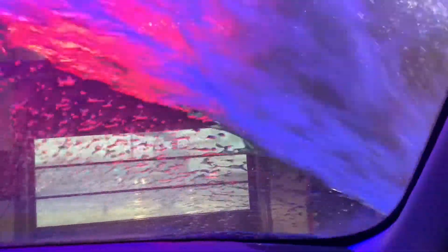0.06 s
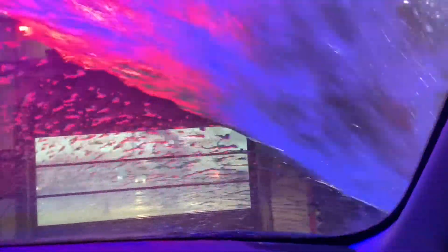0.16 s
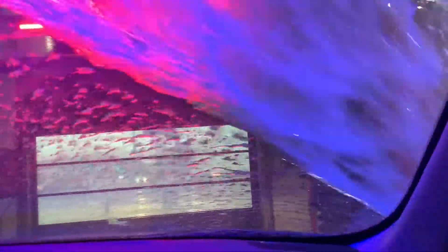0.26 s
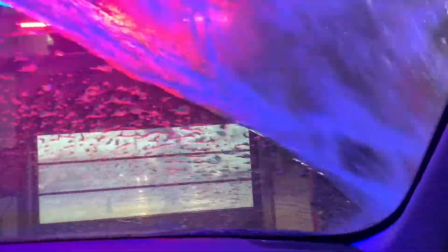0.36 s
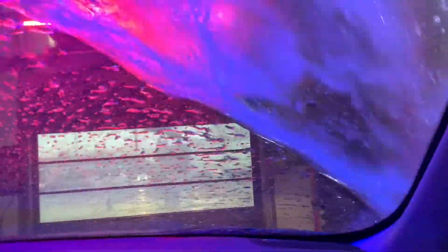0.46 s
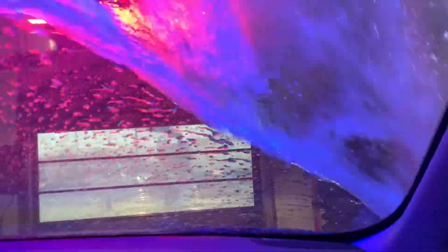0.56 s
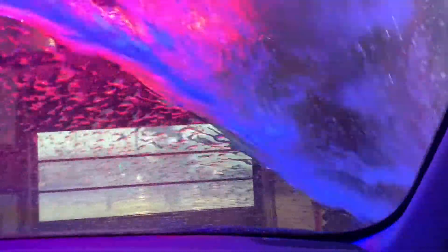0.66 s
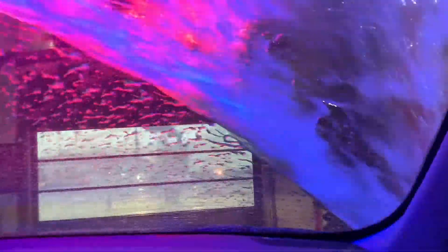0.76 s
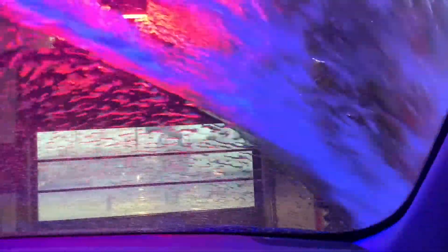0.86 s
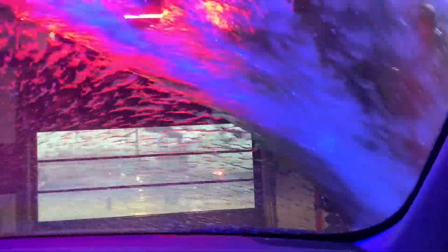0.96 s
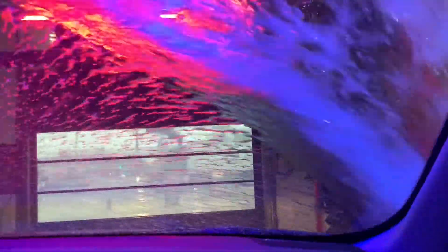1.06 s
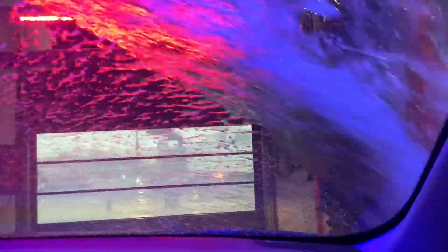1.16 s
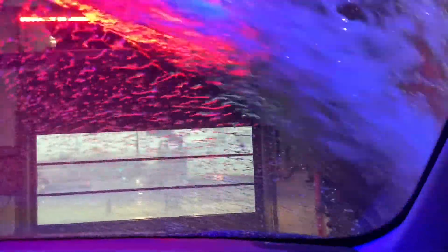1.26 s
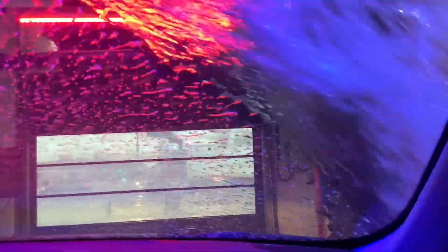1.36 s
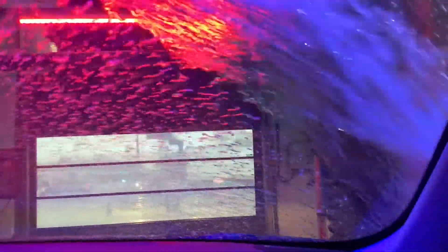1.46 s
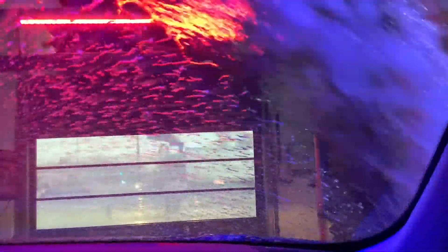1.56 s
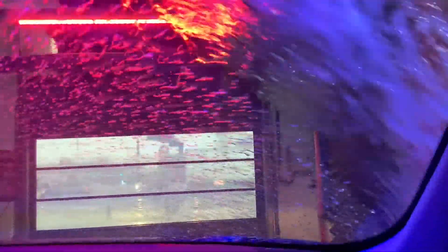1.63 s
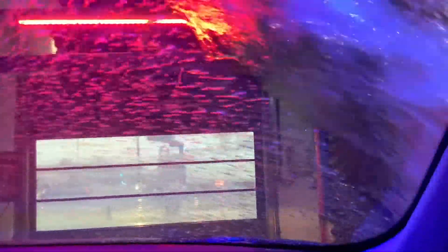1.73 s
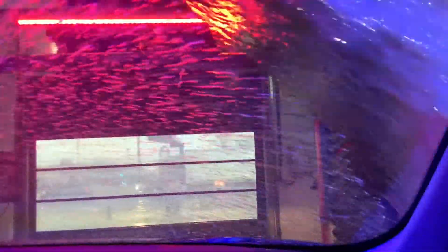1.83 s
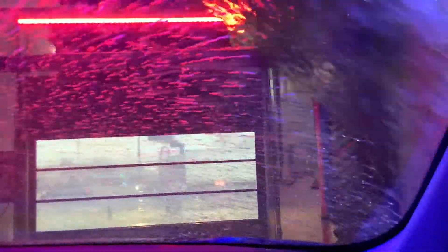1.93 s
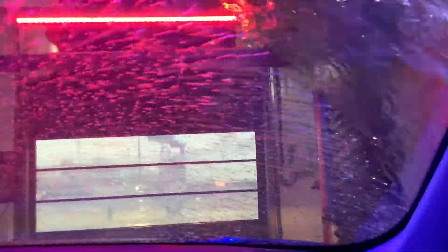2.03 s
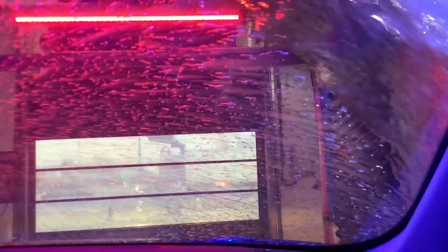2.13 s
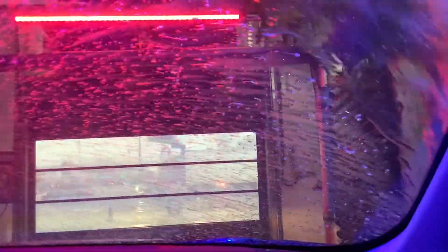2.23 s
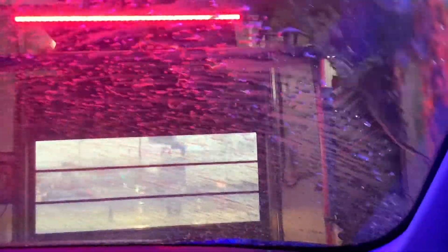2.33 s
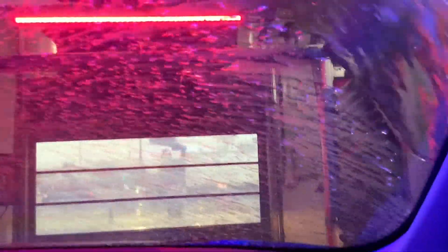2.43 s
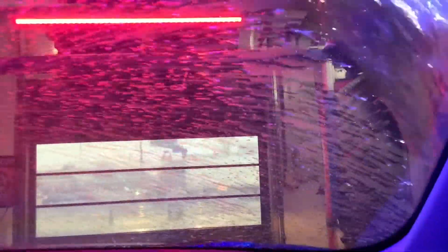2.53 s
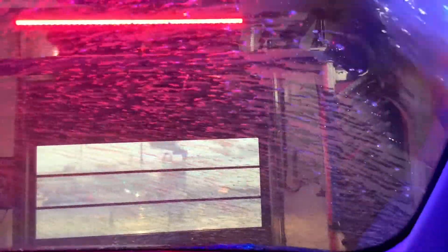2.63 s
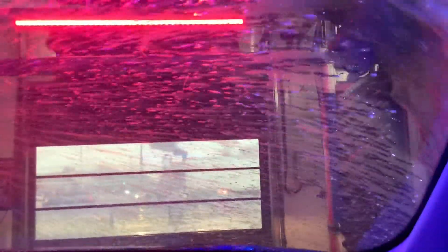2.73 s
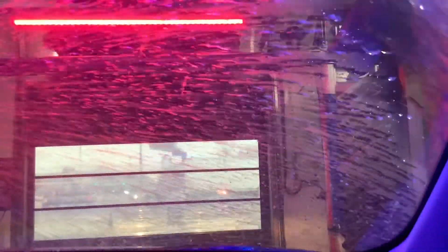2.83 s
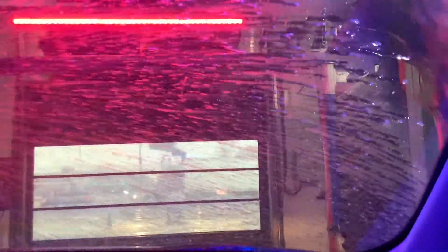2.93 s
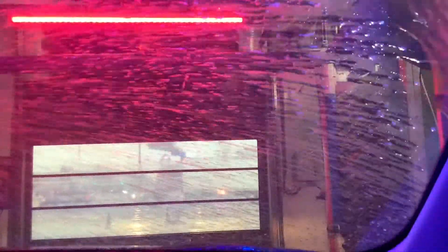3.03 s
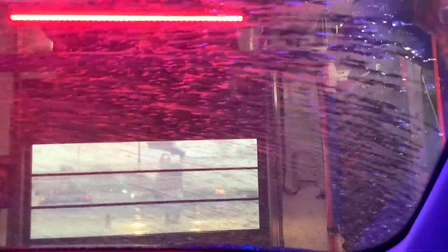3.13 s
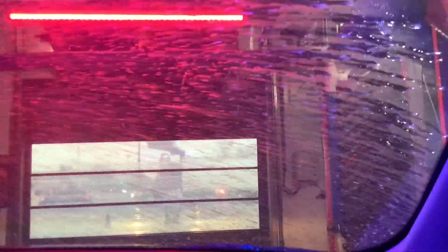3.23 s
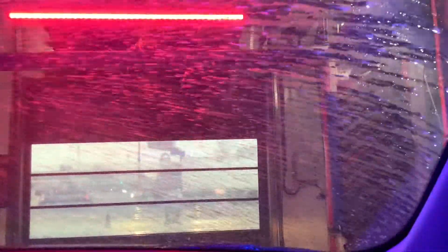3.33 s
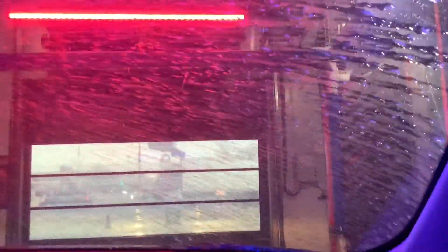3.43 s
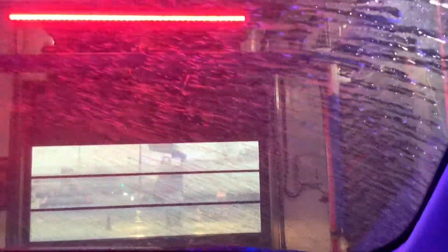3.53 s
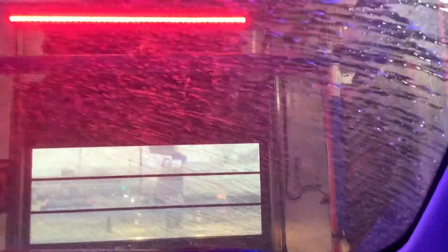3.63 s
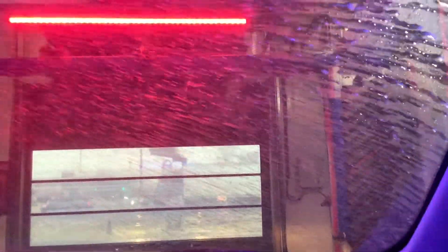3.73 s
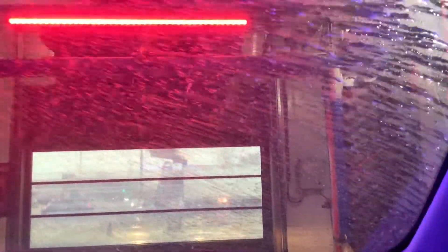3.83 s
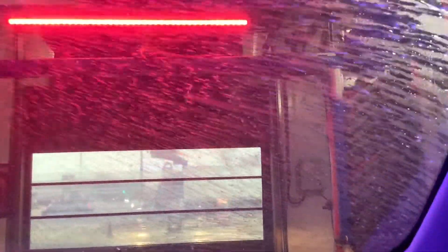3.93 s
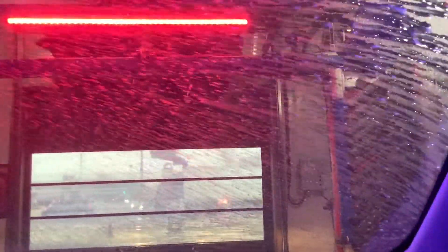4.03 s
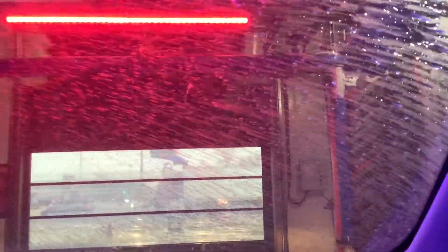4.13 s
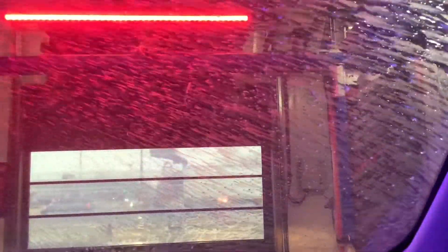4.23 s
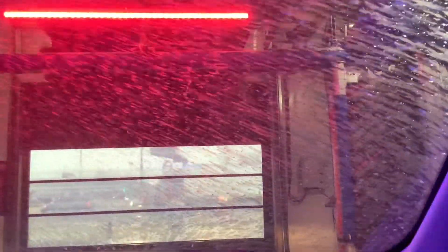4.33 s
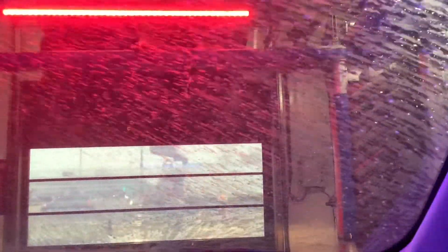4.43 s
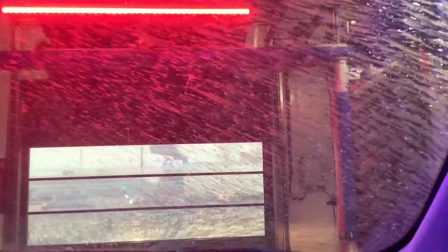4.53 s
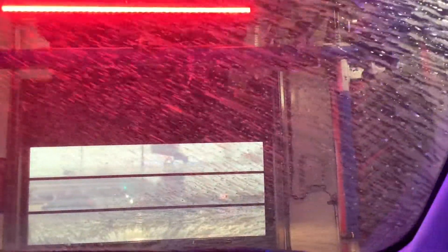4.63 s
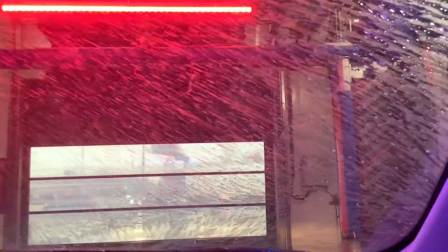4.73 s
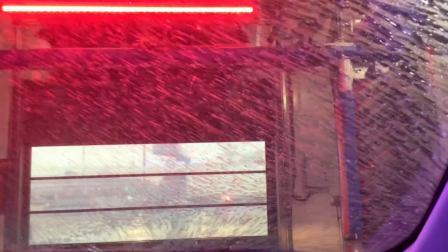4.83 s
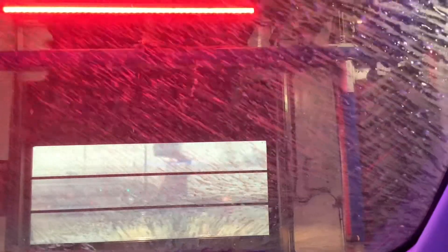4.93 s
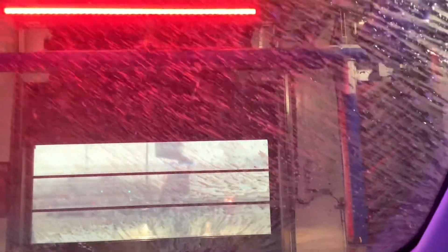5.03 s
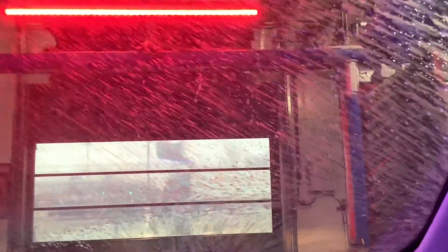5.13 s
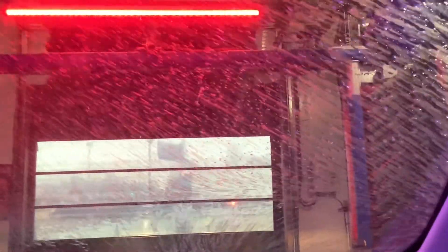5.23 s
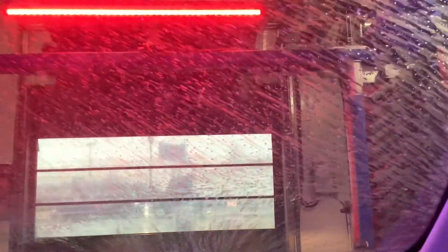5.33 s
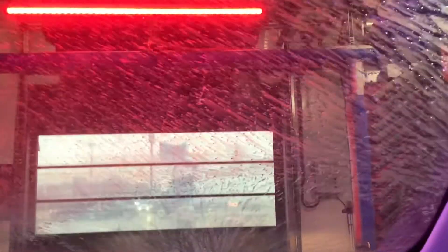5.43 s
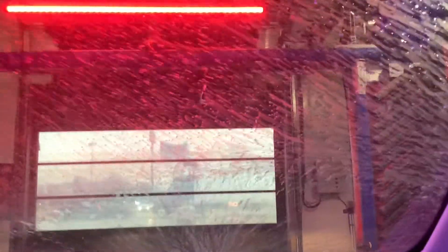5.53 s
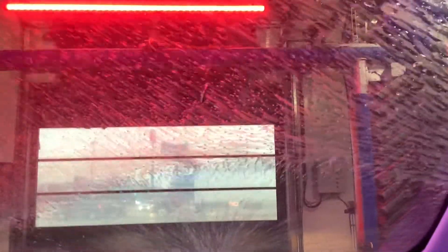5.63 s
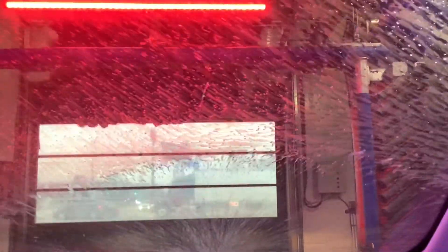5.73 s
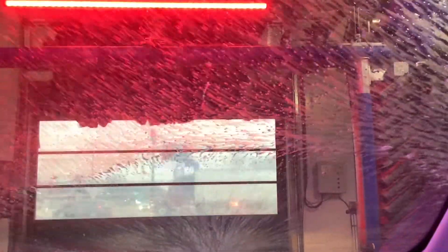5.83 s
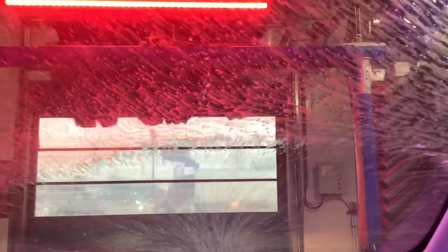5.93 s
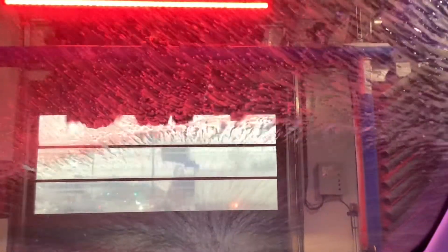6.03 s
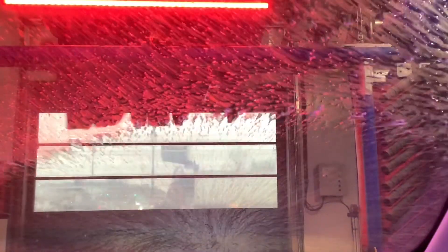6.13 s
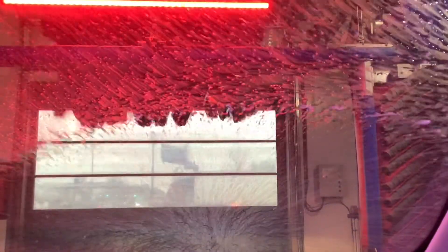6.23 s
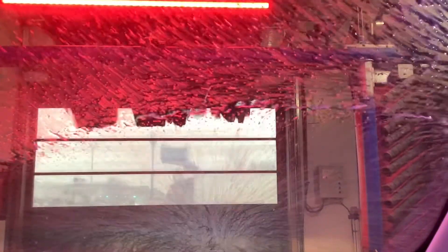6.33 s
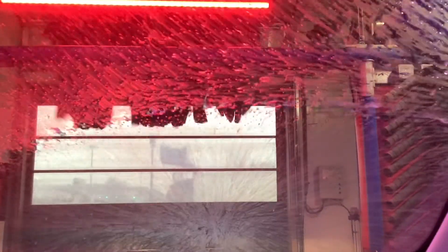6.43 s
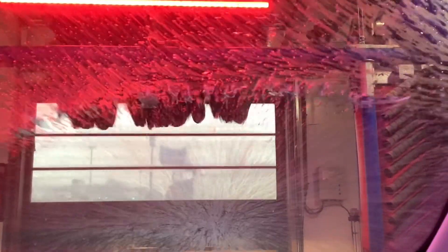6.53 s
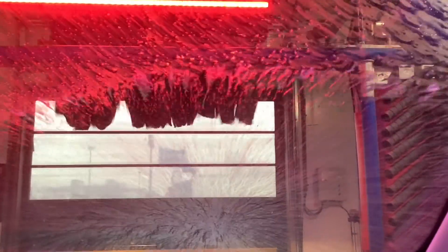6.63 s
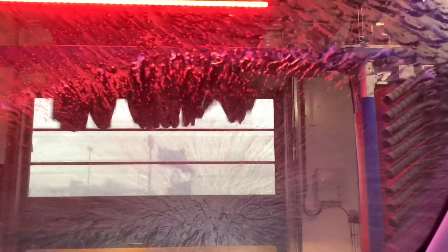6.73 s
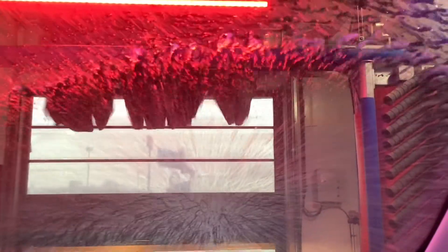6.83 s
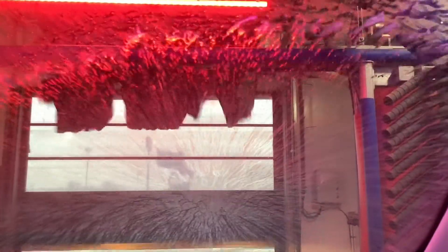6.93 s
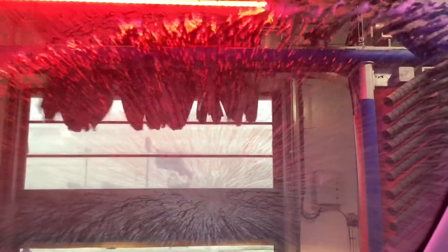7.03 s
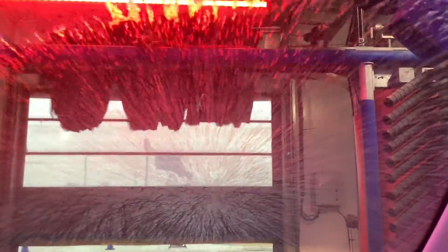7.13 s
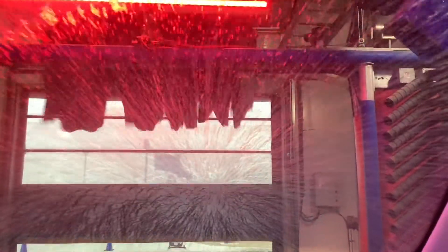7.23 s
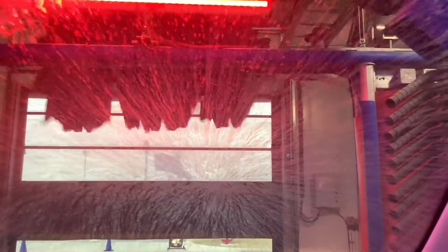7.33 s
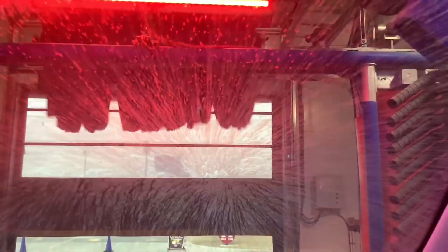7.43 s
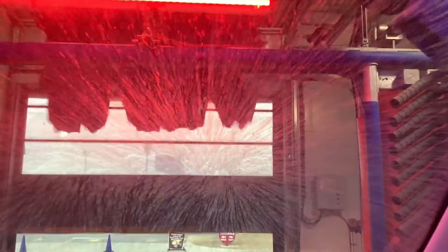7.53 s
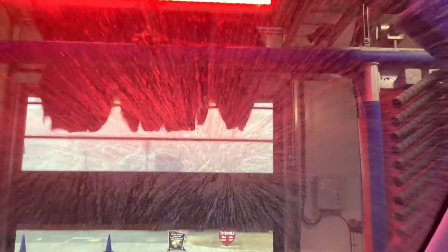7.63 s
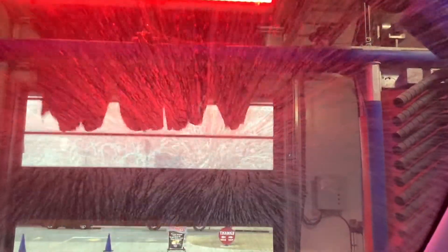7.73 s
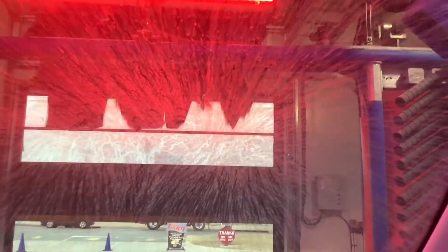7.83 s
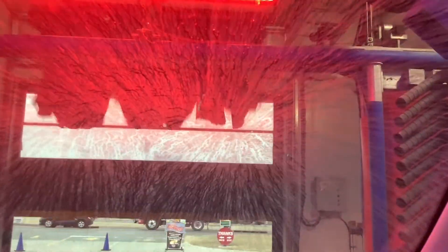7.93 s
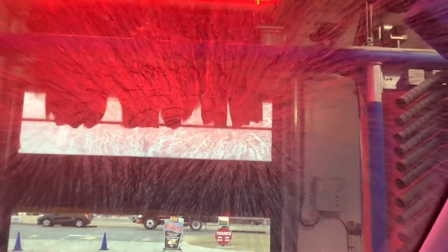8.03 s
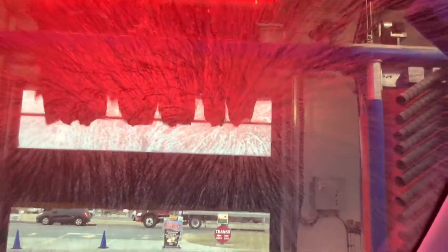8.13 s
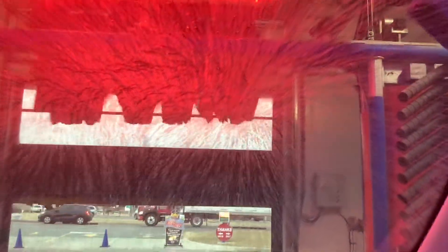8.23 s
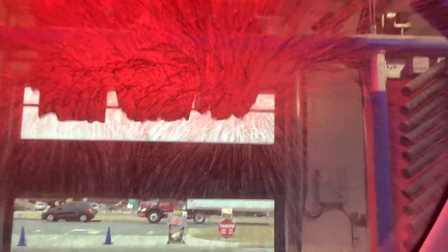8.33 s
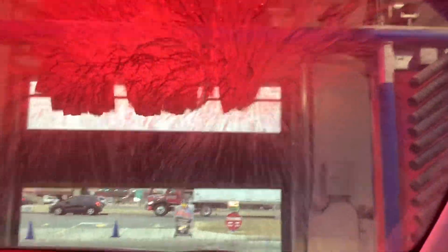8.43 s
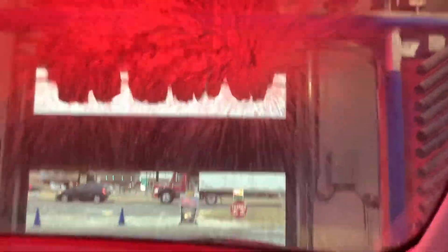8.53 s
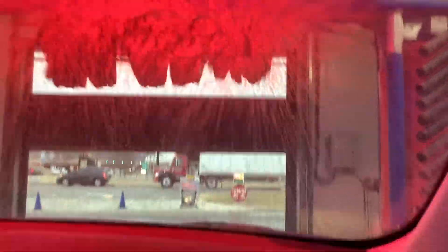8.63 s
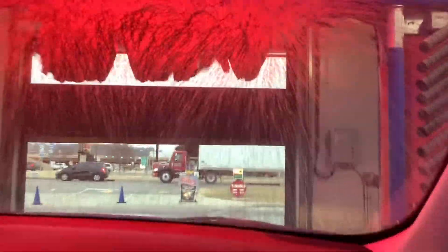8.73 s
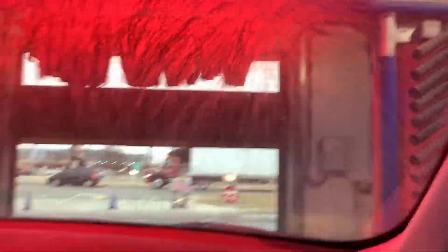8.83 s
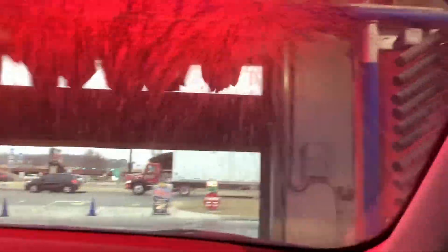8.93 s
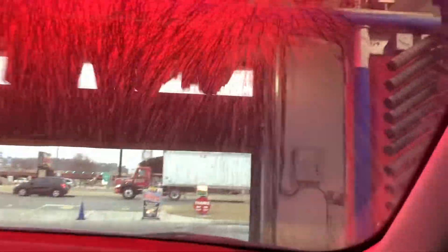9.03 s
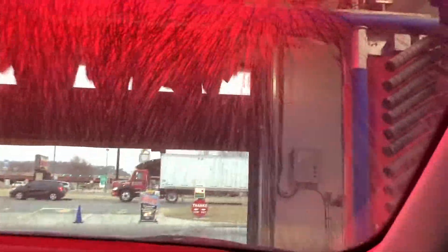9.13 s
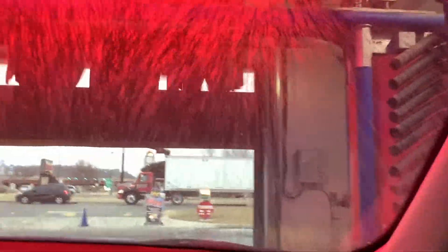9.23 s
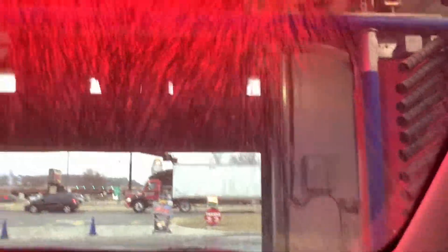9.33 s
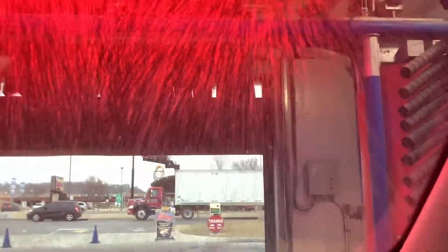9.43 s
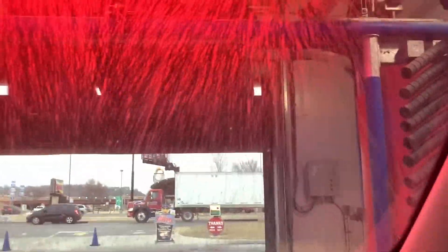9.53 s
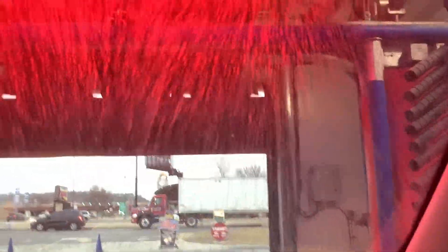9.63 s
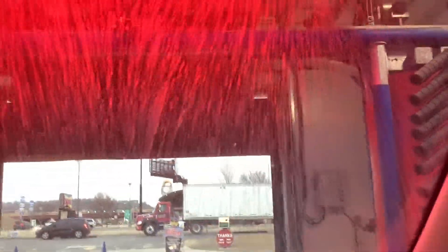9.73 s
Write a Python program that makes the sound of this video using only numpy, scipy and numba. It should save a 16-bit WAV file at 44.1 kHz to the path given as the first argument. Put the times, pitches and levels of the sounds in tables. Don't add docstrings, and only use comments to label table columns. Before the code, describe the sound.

From the front seat of a closed car in a wash tunnel, rinse water hisses and slops across the windscreen with dull, ringing knocks for three seconds. Low rumble underlies it. Dryer air then grows into a heavy, fluttering cabin boom with roof drumming and wandering hum, while the water hiss thins. Small plastic ticks and faint cloth rustle sound close to the phone near the end.

```python
import sys
import numpy as np
from scipy import signal
from scipy.fft import rfft, irfft
from scipy.io import wavfile
from scipy.ndimage import uniform_filter1d, map_coordinates
from numba import njit

SR = 44100
rng = np.random.default_rng(int(sys.argv[2]) if len(sys.argv) > 2 else 0)


def gain_from_db(level_db):
    decades = np.asarray(level_db, float) / 20
    return 10 ** decades


def store_wav(level_fs):
    pcm = np.round(np.clip(np.atleast_2d(level_fs), -1, 1) * 32767)
    wavfile.write(sys.argv[1], SR, pcm.T.astype(np.int16))


N = 430416
FREQ = np.arange(N // 2 + 1) * SR / N
TIME = np.arange(N) / SR

# (time [s], force [dB], share on the roof panels [0-1])
BLOWER = [(0, -25, 0.47), (1, -25.5, 0.19), (1.6, -29, 0.4), (2.2, -24.5, 0.26), (3.3, -26.5, 0.3),
          (4, -24.5, 0.26), (4.6, -20.5, 0.13), (5.3, -15, 0.28), (5.8, -17, 0.62), (6.6, -14.5, 0.63),
          (7.2, -15.5, 0.27), (8.2, -15, 0.44), (9.1, -17, 0.29), (9.76, -17.5, 0)]
FAR_FORCE_DB = -25
# (frequency [Hz], width [Hz], level [dB])
MOTOR_MODES = [(707, 8.4, -46), (974.6, 27, -53.5), (1415, 39, -57), (1632, 130, -59)]

# (frequency [Hz], width [Hz], level [dB])
CABIN_MODES = [(78.2, 5.2, -1.5), (87.7, 9.7, 0), (100.6, 10, -1.5), (117.8, 14.4, 1)]
# (frequency [Hz], width [Hz], level [dB])
UPPER_CABIN_MODES = [(141, 30, -2.5), (164.5, 18, -7), (182.4, 26, -6.5), (211, 6.8, -7.5)]
# (frequency [Hz], level [dB])
PANEL_SPECTRUM = [(120, -24), (200, -7.5), (253, -8.5), (385, -11.5), (491, -12), (712, -23), (781, -22.5),
                  (1100, -33.5), (1430, -37), (2420, -120)]
# (time [s], lift [dB], length [s])
BOOM_BUFFETS = [(.04, -1, 0.063), (1.0, 3.5, 0.045), (2.15, 5, 0.061), (2.66, -15, 0.058),
                (3.59, -1.5, 0.04), (4.29, 6.5, 0.064), (5.16, -29, 0.016), (6.11, 1.5, 0.057),
                (6.22, 2, 0.062), (6.41, -3, 0.041), (6.67, 0.5, 0.066), (6.79, -8, 0.064),
                (6.87, 7.5, 0.023), (6.98, -4.5, 0.053), (7.18, 2, 0.073), (7.34, -6, 0.19),
                (7.8, 5.5, 0.03), (7.91, -7, 0.041), (8.26, 4, 0.046), (8.62, 0.5, 0.038),
                (8.89, -5, 0.039), (9.1, 10.5, 0.05), (9.2, -3, .06), (9.68, 7, 0.041)]
# (time [s], lift [dB], length [s])
UPPER_BUFFETS = [(.75, 2.5, .06), (5.4, -2.5, .1), (7.3, 1, .08), (8.3, 1, 0.097), (8.55, 0.5, .08),
                 (9.0, 2.5, 0.052), (9.45, 0.5, .06), (1.4, 4.5, 0.43), (2.17, 4, 0.11), (3.45, -1, 0.18),
                 (3.7, 3.5, 0.046), (4.1, 1.5, 0.097), (4.61, -8, 0.075), (5.03, -5, 0.03),
                 (5.2, -3.5, 0.046), (5.63, 9, 0.019), (6.08, 3.5, 0.071), (6.22, 3, 0.065),
                 (6.52, 1.5, 0.053), (6.69, 4, 0.064), (7.04, 3.5, 0.041), (7.62, 1, 0.056),
                 (7.91, -5.5, 0.044), (8.07, 2.5, 0.043), (8.74, 3, .03), (8.85, 7.5, 0.021),
                 (9.12, -11, 0.044), (9.62, 0.5, 0.046)]
# (time [s], lift [dB], length [s])
SHAKE_JOLTS = [(.15, -3, .2), (1.2, -1, .12), (1.6, -5, .1), (2.4, 1, .1), (3.4, 6, .12), (3.9, -4, .1),
               (4.35, -4, .1), (5.2, 2, .1), (5.6, 1, .08), (5.95, 6, .08), (6.3, -3, .1), (7.0, 4, .1),
               (7.5, 1, .15), (8.0, 0, .1), (8.6, 2, .15), (9.2, 3, .12)]
# (time [s], lift [dB], length [s])
DRUM_GUSTS = [(3.65, -2, 0.055), (4.4, 0.5, .06), (5.55, 0, 0.11), (6.0, 0, .06), (6.6, 0.5, .08),
              (6.9, 0.5, .08), (8.3, -0.5, .08), (.25, 1, 0.084), (.6, 2.5, 0.074), (.82, 0, 0.11),
              (1.33, -3, 0.064), (1.87, 1, 0.12), (2.4, 1.5, .15), (3.0, 1, 0.065), (3.85, -2, 0.081),
              (4.05, 2, 0.041), (4.65, 1, 0.076), (5.8, -0.5, .15), (6.2, -0.5, 0.16), (7.2, 3, 0.064),
              (7.48, 2.5, 0.13), (7.73, -1, .12), (8.1, -1.5, .08), (8.55, 2, 0.066), (9.15, 0.5, 0.059),
              (9.6, 0.5, .08)]
# (time [s], deep lift [dB], higher lift [dB], length [s])
SWAYS = [(.1, 8, -0.5, 0.2), (.9, -3, -3, 0.071), (1.4, 4.5, -3, 0.14), (2.15, -0.5, -4.5, 0.29),
         (2.65, 10, -1, 0.074), (2.847, 1, -4, .08), (3.213, 7, 3, 0.08), (3.5, 2, -1, 0.13),
         (3.9, 0, 1.5, 0.091), (4.203, 2, -7, 0.068), (4.596, 1, -2, 0.13), (5.1, 1, -4, 0.092),
         (5.736, 8, -11, 0.058), (6.0, 0, 3, 0.15), (6.7, 0, 3.5, 0.21), (7.204, 8.5, -1, 0.16),
         (7.373, 2, -9, .08), (7.8, 2, 2, 0.059), (8.25, 1.5, -1.5, 0.072), (8.5, -1, -5, 0.13),
         (8.844, -2, 2.5, 0.12), (9.053, -13, 0.5, 0.09), (9.3, -0.5, 0.5, 0.13), (9.75, 0, -6, 0.059)]
# (time [s], pitch [Hz])
HUM_PITCH = [(4.5, 112.1), (5.3, 111.9), (5.7, 108.9), (5.9, 117.6), (6.2, 106.3), (6.5, 116.2),
             (6.65, 109.9), (7.0, 114.3), (7.4, 107.9), (7.7, 116.1), (8.1, 111.6), (8.4, 114.4),
             (8.75, 104), (9.15, 115.7), (9.5, 107.7), (9.76, 99.8)]
# (time [s], pitch [Hz], level against the boom [dB])
UPPER_HUM = [(4.6, 158.9, -12), (5.2, 173.1, -10), (5.6, 152, -6), (6.0, 158, -8), (6.3, 166, -5.5),
             (6.75, 155, -10), (7.05, 165, -8), (7.3, 176.3, -11), (7.65, 174.1, -5.5), (8.0, 174.7, -7),
             (8.3, 163, -7), (8.6, 150.3, -10), (8.88, 185.2, -6), (9.2, 152, -16.5), (9.5, 186.7, -4),
             (9.76, 170, -6)]

# (frequency [Hz], width [Hz], level [dB])
GLASS_MODES = [(658, 80, 2), (998, 190, 1), (1470, 163, 0.5), (1685, 55, -0.5), (1957, 170, -2.5),
               (2210, 440, -6.5)]
# (time [s], water left on it [dB], air tearing at it [dB])
SCREEN = [(0, -36, -43.5), (.5, -33, -42), (1.05, -34, -46), (1.4, -34, -47), (1.9, -36.5, -48),
          (2.4, -33.5, -47.5), (2.66, -33, -45.5), (3.05, -32, -46.5), (3.3, -34, -47), (4.85, -36, -47),
          (5.6, -36, -46.5), (6.05, -36, -47), (6.8, -37.5, -49), (7.76, -40.5, -50.5), (8.05, -42, -52.5),
          (9.4, -42.5, -56), (9.76, -41, -55)]
# (time [s], lift [dB])
PATCHES = [(.845, 0), (1.2, 2), (1.37, -2), (1.63, -3), (2.055, -1), (2.143, -2), (2.302, -3), (2.48, -3),
           (2.545, -2), (3.265, -2), (5.88, 2.5), (.14, 1.5), (.25, 1.5), (.43, 1.5), (1.34, -2), (1.66, 0),
           (1.86, 0), (2.03, -1), (2.415, -7), (2.65, 4.5), (3.41, 1), (3.48, -2), (3.69, 4), (3.92, 2),
           (4.12, -1), (4.24, -2), (4.38, 1), (4.46, 1), (4.54, -1), (4.77, 2), (4.89, 0), (4.96, 1),
           (5.08, 0), (5.32, 2), (5.9, 1), (5.95, 2.5), (6.05, 2), (6.2, 0.5), (6.66, 2), (6.88, 2),
           (6.97, -1.5), (7.04, -3), (7.21, 1), (7.26, 1), (7.54, -1), (7.58, -2)]
# (frequency [Hz], level [dB])
STREAM_SPECTRUM = [(290, -24.5), (500, -6), (580, -5.5), (690, -4.5), (788, -7), (976, -10.5), (1100, -8.5),
                   (1400, -9.5), (1830, -11.5), (2000, -13), (3600, -24), (4680, -26.5), (7920, -120)]
# (frequency [Hz], level [dB])
JET_SPECTRUM = [(2400, -0.5), (3600, -1.5), (4400, -2.5), (5050, -3), (5700, -3.5), (6100, -6.5),
                (6800, -6.5)]
# (frequency [Hz], width [Hz], level [dB])
WHISTLE_MODES = [(4400, 150, -6), (5300, 90, 0.5), (5410, 120, -0.5), (7240, 700, -7), (8730, 360, -5)]
# (frequency [Hz], level [dB])
SPRAY_SPECTRUM = [(5600, -7.5), (6400, -15), (7050, -4.5), (8300, -4.5), (8750, -6), (10400, -9),
                  (14600, -16), (16000, -16)]
# (time [s], peak [dB], treble re peak [dB], length [s])
SLOPS = [(0.593, -26, -12, 0.018), (0.905, -24, -16, 0.019), (1.235, -24, -17, .02),
         (1.355, -29, -18, 0.018), (1.412, -22, -14, 0.013), (0.642, -18.5, -19, 0.019),
         (0.863, -21, -13.5, 0.02), (0.991, -16.5, -16, 0.008), (1.07, -21, -11.5, 0.021),
         (1.112, -17, -18, 0.036), (1.269, -17.5, -17, 0.021), (1.444, -21.5, -18, 0.022),
         (1.487, -18.5, -13, 0.021), (1.558, -17, -16.5, 0.05), (1.674, -18.5, -14.5, 0.034),
         (1.748, -16, -21, 0.018), (1.767, -18.5, -13.5, 0.036), (1.803, -19.5, -15, 0.021),
         (1.914, -20, -17, 0.034), (1.972, -22, -11, 0.025), (2.077, -20.5, -13, 0.024),
         (2.152, -17, -16, 0.018), (2.225, -23, -12.5, 0.036), (2.275, -24, -16, 0.082),
         (2.384, -19.5, -20, 0.017), (2.432, -21, -17, 0.012), (2.509, -23, -11, 0.014),
         (2.575, -26.5, -10, 0.013), (2.623, -30, -12, 0.026), (2.688, -19, -20, 0.031),
         (2.81, -33, -15, 0.023), (2.905, -30, -16, 0.019), (3.034, -34, -8, 0.025),
         (3.175, -22, -13, 0.034)]
# (time [s], peak [dB], pitch [Hz])
KNOCKS = [(1.24, -26, 975), (1.362, -22, 976), (1.708, -21, 970), (2.197, -27, 980), (0.4344, -22, 969),
          (0.856, -33, 965), (1.1217, -21, 950), (1.28, -33, 1014), (1.4102, -27, 990), (1.497, -32, 934),
          (1.686, -25, 1000), (1.7559, -27, 934), (1.7736, -20, 963), (1.922, -18, 970), (2.2446, -23, 987),
          (2.5725, -24, 965), (2.7, -16.5, 974), (2.9436, -28, 993), (3.0398, -26, 950)]
# (frequency [Hz], width [Hz], level [dB])
PATTER_MODES = [(700, 60, 0.5), (985, 65, 0), (1430, 90, -4), (1640, 110, -2.5), (2210, 250, -7.5)]

# (time [s], peak [dB], low knock re peak [dB], bright edge re peak [dB], knock pitch [Hz])
TICKS = [(8.0067, -45, -1, -2, 4500), (8.0108, -40, -8, -16, 4600), (8.0714, -52, -5, -12.5, 4400),
         (8.1986, -43, -11, -10.5, 4400), (8.3657, -42, -6, -7, 4798), (8.3727, -45, -8, -10, 5700),
         (8.6275, -53, -0.5, -15.5, 4400), (8.671, -46, 3, -10, 3600), (8.8414, -36, -2.5, -9, 5100),
         (8.9116, -23.5, -9, -7, 4670), (8.9714, -54, -4.5, -15, 5000), (8.996, -40.5, -1, -17, 4700),
         (9.0054, -50, -3, -30, 5500), (9.0356, -43, -5, -21, 4600), (9.117, -53, 0, -30, 7500),
         (9.7325, -56, 8, -32, 7030)]
# (time [s], peak [dB], length [s])
RUBS = [
    (8.615, -58, .001),
    (8.676, -55, .005),
    (8.891, -57, .002),
    (8.228, -58, 0.025),
    (8.288, -51, .025),
    (8.473, -58, 0.023),
    (8.63, -61.5, 0.02),
    (8.692, -60, .016),
    (8.81, -62.5, .03),
]


def unit(x):
    return x / np.sqrt(np.mean(x ** 2))


def columns(table):
    s, *cols = np.transpose(table)
    return [np.interp(TIME, s, c) for c in cols]


def bumps(rows):
    return sum(height * np.exp(-((TIME - s) / length) ** 2) for s, height, length in rows)


def shape(spectrum, skirt_db=-30):
    hz, db = np.transpose(spectrum)
    octave = np.log2(FREQ + 1)
    below = np.maximum(np.log2(hz[0]) - octave, 0)
    above = np.maximum(octave - np.log2(hz[-1]), 0)
    return gain_from_db(np.interp(octave, np.log2(hz), db) + skirt_db * (below + above))


def modes(table):
    total = 0
    for k, (hz, width_hz, db) in enumerate(table):
        damping = 1j * FREQ * width_hz
        total = total + (-1) ** k * gain_from_db(db) * damping / (hz ** 2 - FREQ ** 2 + damping)
    return total


def unrelated_modes(table):
    return np.sqrt(sum(np.abs(modes([mode])) ** 2 for mode in table))


def through(x, gain):
    return irfft(rfft(x) * gain, N)


def drift(noise, rate_hz):
    k = int(SR / rate_hz)
    return unit(uniform_filter1d(uniform_filter1d(noise, k), k))


def walk(rate_hz):
    k = int(SR / rate_hz)
    held = np.repeat(rng.standard_normal(N // k + 1), k)
    return unit(uniform_filter1d(uniform_filter1d(held, k), k)[:N])


def turbulence(gain, shared_db, own_db, rate_hz):
    source = rfft(rng.standard_normal(N)) * gain
    band = np.round(2 * np.log2(FREQ + 1))
    shared = shared_db * walk(rate_hz)
    total = np.zeros(N)
    for b in range(int(2 * np.log2(60)), int(band.max()) + 1):
        total += gain_from_db(shared + own_db * walk(rate_hz)) * irfft(source * (band == b), N)
    return unit(total)


def steady(gain, hold_s, share):
    x = through(rng.standard_normal(N), gain)
    k = int(hold_s * SR)
    power = uniform_filter1d(uniform_filter1d(x ** 2, k), k)
    return unit(x / power ** (share / 2))


def bend(note, pitch_hz, centre_hz):
    return map_coordinates(note, [np.cumsum(pitch_hz / centre_hz)], order=1, mode="mirror")


@njit
def follow(x, attack, release):
    e, out = 0., np.empty(len(x))
    for i in range(len(x)):
        e += (abs(x[i]) - e) * (attack if abs(x[i]) > e else release)
        out[i] = e
    return out


def motor():
    near = np.interp(TIME, [1.5, 3.0, 7.5, 9.76], [0.33, 0.74, 0.73, 0.74])
    air = rng.standard_normal(N)
    waver = gain_from_db(2.6 * drift(air, 4))
    whine = np.zeros(N)
    for hz, width_hz, db in MOTOR_MODES:
        whine += gain_from_db(db) * unit(through(air, modes([(hz, width_hz, 0)]) ** 2))
    return near * waver * whine


def rustle():
    envelope = bumps([(s, gain_from_db(db), length) for s, db, length in RUBS])
    rub = envelope * gain_from_db(2.5 * walk(60)) * rng.standard_normal(N)
    return through(rub, modes([(13490, 12000, 0.0054)]) ** 2)


def ticks():
    size = 1024
    out = np.zeros(N + size)
    signs = np.sign(rng.standard_normal((len(TICKS), 3, size)))
    t = np.arange(size) / SR
    hz = np.arange(size // 2 + 1) * SR / size

    def hump(start_s, peak_s):
        u = np.maximum(t - start_s, 0) / peak_s
        return u * np.exp(1 - u)

    def ring(x, mode_hz, width_hz):
        damping = 1j * hz * width_hz
        y = irfft(rfft(x) * (damping / (mode_hz ** 2 - hz ** 2 + damping)) ** 2)
        return y / np.abs(y).max()

    blow = hump(0.0003, 0.00032) + gain_from_db(-22) * hump(0.0015, 0.0009)
    snap = hump(0.0005, 0.00003) + 0.6 * hump(0.0009, 0.00003) + 0.25 * hump(0.0023, 0.00003)
    bounce = gain_from_db(-26) * hump(0.0022, 0.0003) + gain_from_db(-30) * hump(0.002, 0.002)
    for (s, db, knock_db, bright_db, knock_hz), (a, b, c) in zip(TICKS, signs):
        body = ring(a * blow, 8200, 5000)
        edge = gain_from_db(bright_db + 9.0) * ring(b * blow, 13500, 7000)
        knock = gain_from_db(knock_db + 6.0) * ring(snap + c * (0.17 * blow + bounce), knock_hz, 0.46 * knock_hz)
        thud = gain_from_db(knock_db - 4.0) * ring(snap + c * 0.44 * blow, 3000, 2000)
        i = int(s * SR)
        out[i:i + size] += gain_from_db(db + 7.0) * (body + edge + knock + thud)
    return out[:N]


def patter():
    rate_per_s, level_db, spread_db = 250, -10, 4
    hits = rng.random(N) < rate_per_s / SR
    sizes = gain_from_db(spread_db * rng.exponential(size=N))
    drops = hits * np.sign(rng.standard_normal(N)) * sizes
    wet = np.interp(TIME, [0, 1.0, 2.8, 5.0, 7.5], [0.6, 0.9, 0.78, 0.65, 0.3])
    water_db = columns(SCREEN)[0]
    return wet * gain_from_db(water_db + level_db) * unit(through(drops, modes(PATTER_MODES)))


def knocks():
    size, rise_s, fall_s, level_db = 8192, 0.0072, 0.016, -8.5
    overtone_ratio, overtone_db = 1.46, -10
    out = np.zeros(N + size)
    t = np.arange(size) / SR
    envelope = 2 * (1 - np.exp(-t / rise_s)) * np.exp(-t / fall_s)
    for s, db, hz in KNOCKS:
        tone = np.sin(2 * np.pi * hz * t)
        tone += gain_from_db(overtone_db) * np.sin(2 * np.pi * overtone_ratio * hz * t)
        i = int(s * SR)
        out[i:i + size] += gain_from_db(db + level_db) * envelope * tone
    return out[:N]


def slops():
    low, high = np.zeros(N), np.zeros(N)
    for s, db, treble_db, length_s in SLOPS:
        u = np.clip((TIME - s) / length_s, 0, 50)
        swell = gain_from_db(db - 12.5) * u * np.exp(1 - u * 2.31) * 2.1
        low += swell
        high += swell * gain_from_db(treble_db + 4.5)
    ring = steady(modes(GLASS_MODES), 0.0088, 0.48)
    splash = steady(shape([(2600, 9.5), (6000, -0.5), (9000, -11.0)]), 0.008, 0.6)
    edge = shape([(200, 0), (2680, 0)], skirt_db=-24)
    pane = 1 + 0.62 * modes([(1000, 40, -6), (1410, 70, 2), (2500, 210, 3)])
    return through(low * ring, edge * pane) + high * splash


def stream(water_db, patch_db):
    pane = 1 + 0.5 * np.abs(modes(GLASS_MODES)) ** 2
    return gain_from_db(water_db + patch_db) * turbulence(shape(STREAM_SPECTRUM) * pane, 0.47, 0.18, 22)


def jet(air_db, patch_db):
    facing = np.interp(TIME, [2.1, 2.9, 4.5, 6.2, 7.75, 8.05], [0.11, 0.73, 0.85, 1.2, 1.1, 0])
    air = rng.standard_normal(N)
    whistle = gain_from_db(-6.5 + 2.7 * drift(air, 6)) * facing * unit(through(air, modes(WHISTLE_MODES)))
    tearing = turbulence(shape(JET_SPECTRUM), 0.76, 0.46, 20)
    return gain_from_db(air_db + 0.93 * patch_db) * (tearing + whistle)


def spray(air_db):
    usual_air_db, usual_db, db_per_air_db = -47, -53, 1.2
    level = gain_from_db(usual_db + db_per_air_db * (air_db - usual_air_db))
    mist = turbulence(shape(SPRAY_SPECTRUM), 0.82, 0.55, 26)
    top = through(mist, np.clip(FREQ / 9000 - 0.7, 0, 1))
    return level * (mist - top + top * (level / gain_from_db(-64.5)) ** 0.27)


def water():
    patch_db = bumps([(s, db, 0.011) for s, db in PATCHES])
    water_db, air_db = columns(SCREEN)
    return stream(water_db, patch_db) + jet(air_db, patch_db) + spray(air_db)


def upper_hum():
    mode_hz, width_hz = 165, 11.7
    pitch_hz, level_db = columns(UPPER_HUM)
    note = steady(modes([(mode_hz, width_hz, 0)]) ** 2, 0.06, 0.7)
    force_db = columns(BLOWER)[0]
    return gain_from_db(force_db + level_db + 0.5 * bumps(UPPER_BUFFETS)) * bend(note, pitch_hz, mode_hz)


def hum():
    mode_hz, width_hz, level_db = 112.76, 6.8, -4.5
    close = np.interp(TIME, [4.2, 5.4, 8.0, 8.8], [0.048, 0.74, 0.85, 1.05])
    note = steady(modes([(mode_hz, width_hz, 0)]) ** 2, 0.12, 0.7)
    note = bend(note, columns(HUM_PITCH)[0], mode_hz)
    force_db = columns(BLOWER)[0]
    return close * gain_from_db(force_db + level_db + 0.51 * bumps(BOOM_BUFFETS)) * note


def body_shake(nearer_db):
    level_db = -33 + 0.087 * nearer_db + 2.5 * walk(12) + bumps(SHAKE_JOLTS)
    return gain_from_db(level_db) * steady(modes([(51.0, 23.0, 0)]) ** 2, 0.036, 0.99)


def roof_drum(nearer_db, roof_share):
    level_db = -33 + 0.11 * nearer_db + 11 * roof_share + 1.16 * walk(12) + bumps(DRUM_GUSTS)
    return gain_from_db(level_db) * steady(shape(PANEL_SPECTRUM), 0.061, 0.38)


def upper_cabin(nearer_db):
    level_db = -28.5 + nearer_db - 0.24 * walk(12) + bumps(UPPER_BUFFETS)
    air = steady(unrelated_modes(UPPER_CABIN_MODES) * modes([(167.0, 88, 0)]), 0.073, 0.6)
    overhead = np.interp(TIME, [7.2, 9.4], [0, 1])
    air = air - overhead * through(air, modes([(136.4, 20, 0.0035)]))
    return gain_from_db(level_db) * air


def cabin_boom(force_db):
    sway_hz = 91
    air = steady(unrelated_modes(CABIN_MODES) * modes([(100.2, 70, 0)]), 0.091, 0.31)
    deep = through(air, 1 / (1 + (FREQ / sway_hz) ** 20))
    deep_db = bumps([(s, lift_db, length) for s, lift_db, _, length in SWAYS])
    higher_db = bumps([(s, lift_db, length) for s, _, lift_db, length in SWAYS])
    swayed = gain_from_db(deep_db) * deep + gain_from_db(higher_db) * (air - deep)
    return gain_from_db(force_db + bumps(BOOM_BUFFETS)) * swayed


def dryer():
    force_db, roof_share = columns(BLOWER)
    nearer_db = force_db - FAR_FORCE_DB
    panels = body_shake(nearer_db) + roof_drum(nearer_db, roof_share)
    return panels + upper_cabin(nearer_db) + cabin_boom(force_db)


def scene():
    close_by = ticks() + rustle()
    windscreen = patter() + knocks() + slops() + water()
    blowers = motor() + upper_hum() + hum() + dryer()
    return (close_by + windscreen + blowers)[None]


def treble_steps(x, top_drop_db):
    step_hz, top_hz, step_db = 6150, 15760, -3
    edges_hz = [0, step_hz, step_hz + 1, top_hz, top_hz + 1, SR / 2]
    gain = gain_from_db(np.repeat([0, step_db, step_db - top_drop_db], 2))
    taps = signal.firwin2(401, edges_hz, gain, fs=SR)
    return signal.fftconvolve(np.pad(x, 200, "reflect"), taps, "valid")


def top_cut(x):
    return signal.sosfilt(signal.butter(12, 16670, fs=SR, output="sos"), x)


def record(dry):
    attack_s, release_s, end_hz, fade_s = 0.0033, 0.03, 16750, 0.002
    loud = follow(dry[0], 1 / (attack_s * SR), 1 / (release_s * SR))
    gain = gain_from_db(2.0) * np.minimum(0.47 / (loud + 1e-9), 1) ** 0.62
    rounded = np.tanh(1.013 * gain * dry[0]) / 1.088
    x = signal.sosfilt(signal.butter(4, 39.0, "high", fs=SR, output="sos"), rounded)

    base = treble_steps(x, 60)
    top = treble_steps(x, 3.6) - base
    is_loud = uniform_filter1d(np.abs(top), size=64) > gain_from_db(-57)
    top = top * uniform_filter1d(1.0 * is_loud, size=128)
    roll_off = np.cos(np.pi / 2 * np.clip((FREQ - end_hz) / 500 + 1, 0, 1)) ** 2
    x = base + through(top, roll_off)

    fade = np.sin(np.pi / 2 * np.minimum((TIME[-1] - TIME) / fade_s, 1)) ** 2
    return top_cut(x * fade)


dry = scene()
out = record(dry)
store_wav(out)
```